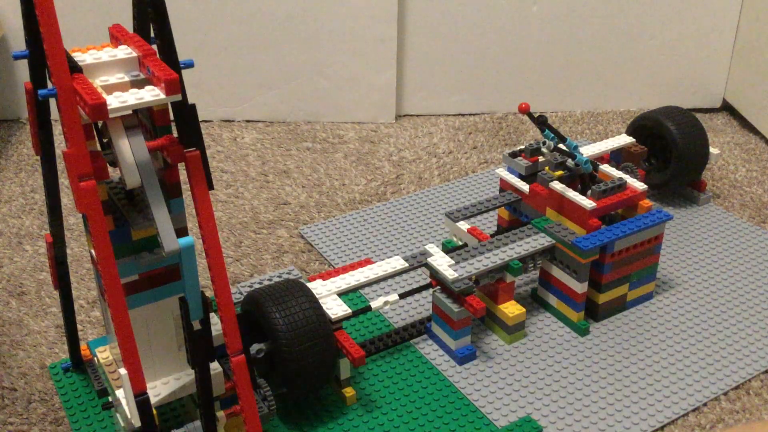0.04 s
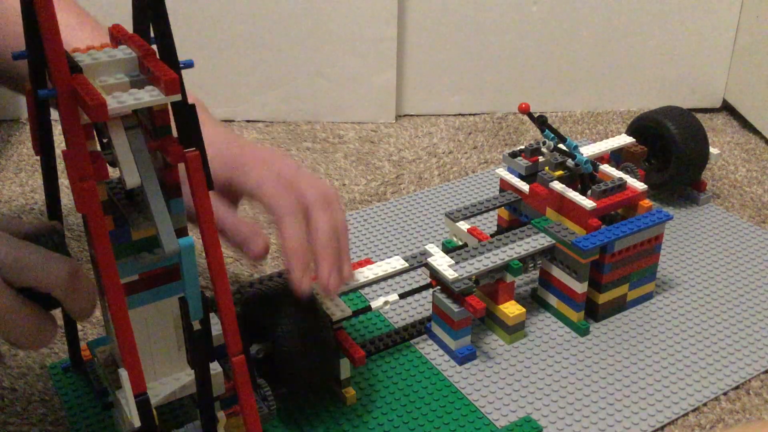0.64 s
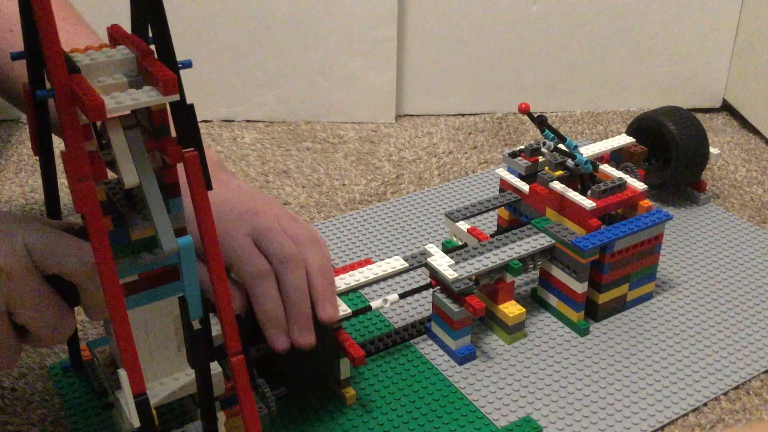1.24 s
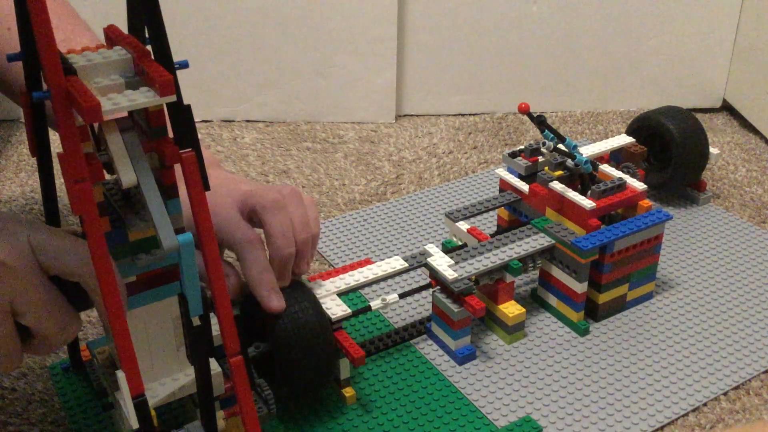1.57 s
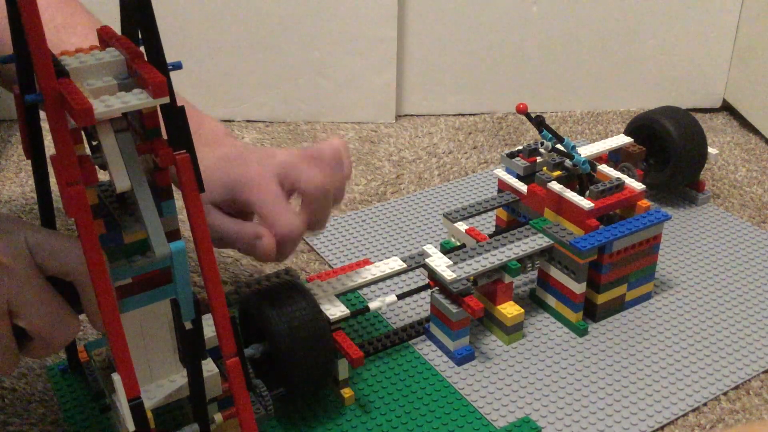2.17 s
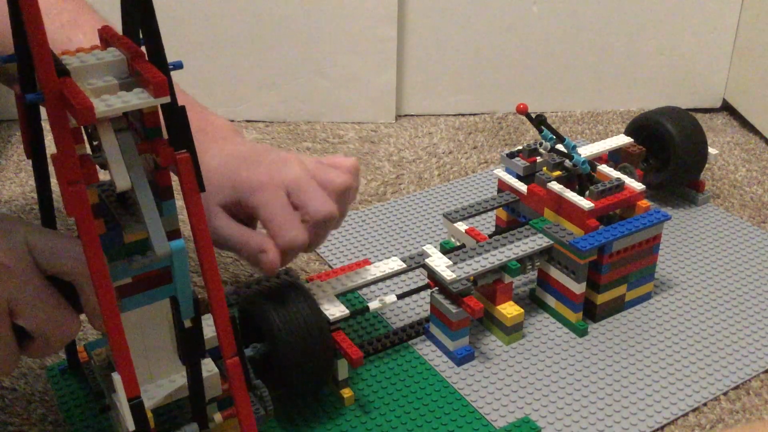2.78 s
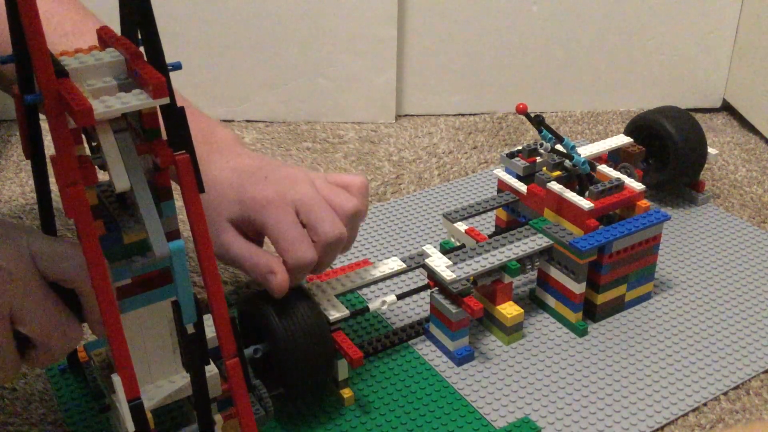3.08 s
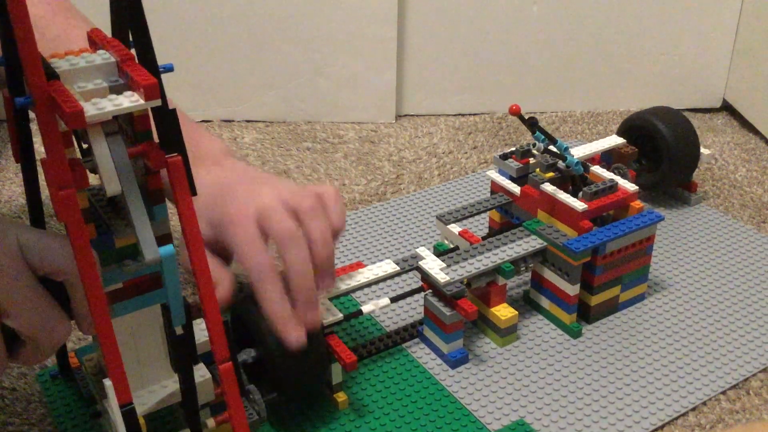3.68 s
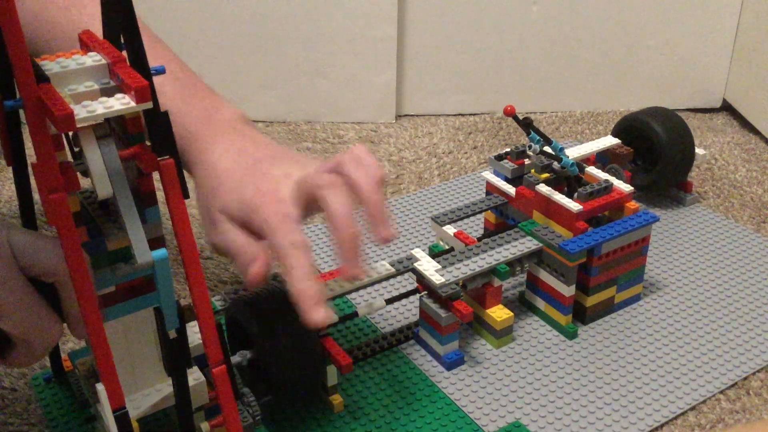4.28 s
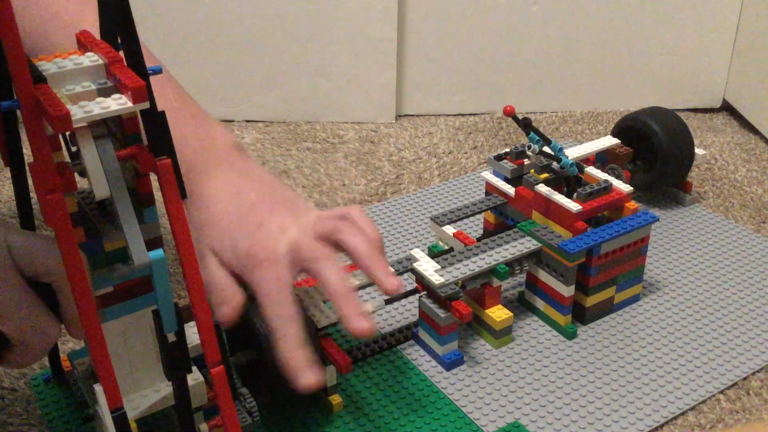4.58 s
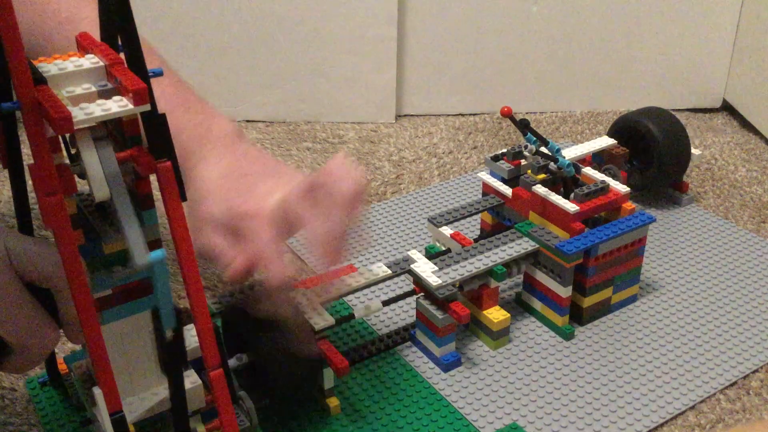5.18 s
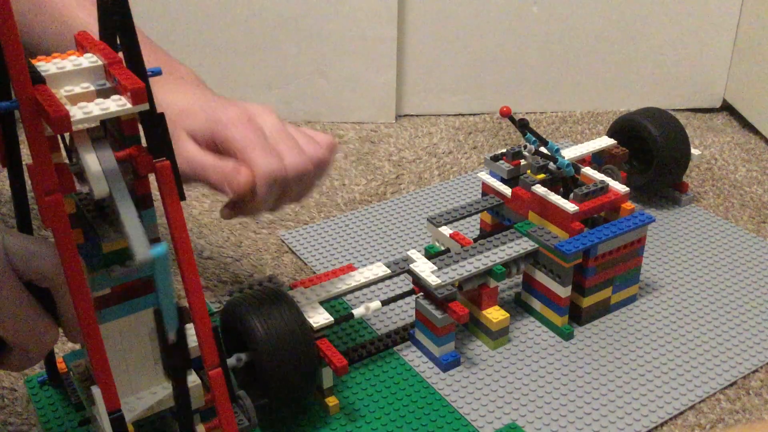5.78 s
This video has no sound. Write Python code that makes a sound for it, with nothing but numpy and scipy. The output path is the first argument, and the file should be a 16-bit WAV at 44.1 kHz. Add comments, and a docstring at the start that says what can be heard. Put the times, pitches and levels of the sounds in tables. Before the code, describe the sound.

A vacuum cleaner runs throughout, close by in a carpeted room, with a steady roar of air, a hum and a high whine. At first its open hose blows hollow, with faint breathy whistles. At about 0.9 seconds the hose seats on a toy engine of plastic bricks. A bright suction hiss starts and grows, while the motor slowly climbs in pitch, its tones swelling and fading.

Tiny high squeaks come from the valve around 1.5 seconds. From 2 to 3 seconds there are short gushes of air, more squeaks and very faint piston knocks. A sharp leak hisses up from 3.1 to 3.4 seconds. The clearest squeak comes with a gush at about 4.1 seconds, and two soft knocks follow near 4.8. From 5.3 seconds to the end, near 6, puffs, squeaks and harder plastic knocks alternate in a quick, uneven run over the whine.

```python
"""A vacuum cleaner hums, whines and roars in a carpeted room, its open hose blowing hollow.
The hose seats on a toy engine of plastic bricks: the choked motor climbs, and its tones swell and fade
through the room's standing waves. Air hisses through the gaps between the bricks. A hand nudges the
flywheel: the slide valve squeaks and gushes, and the piston knocks, faintly at first, then harder."""
import sys
import numpy as np
from scipy import signal
from scipy.fft import rfft, irfft
from scipy.io import wavfile

SR = 44100
rng = np.random.default_rng(int(sys.argv[2]) if len(sys.argv) > 2 else 0)


def transcribe(signal):
    """Save signal, clipped to [-1, 1], as a 16-bit WAV file at the path in sys.argv[1]."""
    frames = np.atleast_2d(signal).T
    limited = np.clip(frames, -1, 1)
    pcm = np.round(limited * 32767).astype(np.int16)
    wavfile.write(sys.argv[1], SR, pcm)


N = 257103
TIME = np.arange(N) / SR
FREQS = np.fft.rfftfreq(N, 1 / SR)
SEAT_S, SEALED_S = 0.883, 1.7  # hose meets the engine, is sealed

# motor shaft speed: t/s, f/Hz
SHAFT_SPEED = [(0.0, 447.7), (0.35, 453.6), (1.02, 456.8), (1.5, 465.9), (2.02, 480.9), (2.37, 486.7),
               (2.98, 486.4), (3.25, 493.2), (3.78, 493.6), (4.13, 502.0), (4.32, 501.0), (4.68, 509.2),
               (4.88, 506.5), (5.29, 510.6), (5.42, 507.2), (5.83, 502.6)]
# resonances of the brick cylinder and its ports: f/Hz, width/Hz, gain/dB
CYLINDER_MODES = [(1714, 200, 7.5), (1984, 120, 4), (2640, 128, -4), (2870, 240, 0.5), (5140, 200, 1.5),
                  (5550, 220, 4.5), (5980, 160, 3.5), (6860, 220, 8.5), (7590, 210, -10), (9840, 120, 6),
                  (10970, 110, 2), (11700, 90, -3)]


def motor(blades=7, jitter=0.00059, flutter_db=1.0, skirt_db=-47, skirt_follow=0.38):
    """Shaft hum and blade whine on one speed; unsteady air gives the whine a fuzzy skirt."""
    # faint overtones: multiple of shaft rate, level/dB re hum
    overtones = [(2, -43), (14, -9.5), (23, -32)]
    # slow drift of the whine: t/s, gain/dB
    whine_drift = [(.5, -1), (2.0, -0.5), (3.7, 2), (4.4, 2), (5.0, .5), (5.8, -1.5)]
    speed_hz = curve(SHAFT_SPEED)
    shaft_hz = speed_hz * (1 + jitter * wander(23))
    phase = 2 * np.pi * np.cumsum(shaft_hz) / SR
    hum = np.sqrt(2) * np.sin(phase)
    for order, db in overtones:
        hum += amp(db) * fuzzy_tone(round(order) * shaft_hz, width_hz=26)
    hum *= amp(standing_wave_db(speed_hz, floor_db=-41))
    whine_db = standing_wave_db(blades * speed_hz, floor_db=-48.5) + curve(whine_drift)
    whine = np.sqrt(2) * np.sin(blades * phase) * amp(whine_db + flutter_db * wander(16))
    # the skirt swells less than the tone: a weak whine is breathy, a strong one pure
    skirt_gain = amp(skirt_db + skirt_follow * (whine_db - whine_db.mean()))
    return hum + whine + skirt_gain * fuzzy_tone(blades * shaft_hz, width_hz=200)


def brick_gaps(gush, rise_s=0.1, mean_speed_db=-28, db_per_hz=0.0992, sag=10, flutter_db=0.47):
    """Suction hiss: starts as the hose seats, grows with motor speed, sags while the valve gushes."""
    # gap spectrum: f/Hz, relative level/dB
    colour = [(300, -61), (1000, -22), (1800, -10.5), (3200, -3), (4500, -17.5), (5700, -9.5), (7500, -11),
              (10400, -5), (11000, 0.5), (12000, 3), (13000, -1), (13900, -8), (15600, -5)]
    speed_hz = curve(SHAFT_SPEED)
    seated = np.clip((TIME - SEAT_S) / rise_s, 0, 1)
    suction = seated * amp(mean_speed_db + db_per_hz * (speed_hz - speed_hz.mean())) / (1 + sag * gush)
    return suction * turbulence(colour, CYLINDER_MODES) * amp(flutter_db * wander(28))


def valve_gush():
    """Gain of the air bursts as the slide valve opens."""
    # openings: t/s, time open/s, level/dB
    openings = [(2.03, 0.078, -32.5), (2.42, 0.066, -32), (2.57, 0.091, -31.5), (2.77, .05, -42),
                (4.15, .12, -31), (4.73, 0.096, -34.5), (5.28, .11, -30.5), (5.445, 0.064, -30.5),
                (5.58, 0.048, -31), (5.7, 0.049, -32.5), (5.81, .03, -39)]
    return sum(amp(db) * swell(s, open_s, attack_s=.011, release_s=.02) for s, open_s, db in openings)


def valve_air(gush):
    """Air seeps through the shut valve and gushes through the open port."""
    # seepage: t/s, level/dB
    seep = [(0, -42), (.45, -35), (.88, -40), (1.2, -34.5), (1.7, -32.5), (2.2, -38.5), (2.75, -32.5),
            (3.1, -38.5), (4.0, -38.5), (4.45, -55), (5.0, -48), (5.83, -36)]
    # port spectrum: f/Hz, relative level/dB
    colour = [(50, -42), (200, -21), (700, -7), (1500, -6), (2800, 3), (4500, 3), (6200, 3), (7200, -7.5),
              (9000, -24), (15000, -37)]
    return np.hypot(level(seep), gush) * turbulence(colour, CYLINDER_MODES)


def leak(level_db=-22):
    """A sharp leak opens while the flywheel is turned."""
    # jet spectrum: f/Hz, relative level/dB
    colour = [(600, -38), (1900, -9), (3400, -4), (4500, -3.5), (6700, -3.5), (7400, -1), (8200, 4.5),
              (9000, -3), (11000, -5), (15500, -9)]
    opening = swell(start_s=3.07, open_s=.29, attack_s=.21, release_s=.03)
    return amp(level_db) * opening * turbulence(colour, CYLINDER_MODES)


def valve_squeaks(full_db=-12, bend_hz=400, rough_per_db=.025, width_hz=220, rise_s=.008, stop_s=.003):
    """The sliding valve sings: strong squeaks are clean and bend up, weak ones rougher and flatter."""
    # squeaks: t/s, length/s, level/dB, f/Hz
    squeaks = [(1.384, .049, -37, 6400), (1.516, 0.066, -32, 3160), (1.731, .017, -24.5, 7650),
               (2.033, 0.015, -25, 7730), (2.05, .063, -32, 7700), (2.423, 0.0094, -19, 7750),
               (2.503, .009, -28, 7650), (2.572, 0.03, -29.5, 7725), (2.777, 0.038, -29, 7450),
               (2.778, 0.049, -30, 6730), (4.144, 0.018, -14, 7870), (4.265, .015, -27, 8600),
               (5.282, 0.01, -18.5, 8070), (5.447, .011, -26, 8070), (5.584, .009, -27, 8050),
               (5.702, 0.0078, -21, 8000), (5.821, 0.008, -19.5, 8000)]
    out = np.zeros(N)
    pole = np.exp(-np.pi * width_hz / SR)
    for s, length_s, db, hz in squeaks:
        progress = np.linspace(0, 1, max(round(length_s * SR), 16))
        grit = signal.lfilter([1], [1, -pole], rng.standard_normal((len(progress), 2)) @ [1, 1j])
        rough = np.clip(rough_per_db * (full_db - db), 0, 1)
        body = np.sqrt(1 - rough) + np.sqrt(rough) * grit / np.sqrt(np.mean(abs(grit) ** 2))
        pitch_hz = hz + bend_hz * amp(db - full_db) * (progress - .5)
        tone = (body * np.exp(2j * np.pi * np.cumsum(pitch_hz) / SR)).real
        rise = np.minimum(progress * length_s / min(rise_s, length_s / 2), 1) ** 1.5
        stop = np.minimum((1 - progress) * length_s / stop_s, 1)
        add(out, s, amp(db) * unit(tone) * rise * stop)
    return out


def piston_knocks(clack_db=-11, clack_t60_s=.025, highpass_hz=62):
    """The piston thumps the frame, whose bricks give a short clack."""
    # stroke ends: t/s, gain/dB
    knocks = [(2.04, -39), (2.119, -36), (2.429, -34), (2.501, -33), (2.711, -30), (2.997, -36),
              (4.743, -25.5), (4.831, -27.5), (5.285, -30.5), (5.392, -24.5), (5.536, -22), (5.581, -26),
              (5.652, -21), (5.699, -24), (5.778, -20), (5.825, -28)]
    # modes of the frame on its base plate: f/Hz, gain/dB, t60/s
    frame_modes = [(92.5, -7.5, 0.066), (119, -3.5, 0.086), (242, -7.5, 0.034), (360, -1.5, 0.018),
                   (1150, -11, 0.026), (2300, -13, .012)]
    out, t = np.zeros(N), np.arange(SR // 5) / SR
    ring = sum(amp(db - 60 * t / t60_s) * np.sin(2 * np.pi * hz * t) for hz, db, t60_s in frame_modes)
    for s, db in knocks:
        clack = rng.standard_normal(len(t)) * amp(clack_db - 60 * t / clack_t60_s)
        add(out, s, amp(db) * (ring + clack))
    # so small a frame radiates no deep bass
    return signal.sosfilt(signal.butter(2, highpass_hz, "highpass", fs=SR, output="sos"), out)


def hose_whistles():
    """The open hose's resonances glide as it is brought up to the engine."""
    # hollow rush at the mouth, deeper as it closes: t/s, level/dB, f/Hz
    mouth = [(0, -41, 1168), (.5, -38.5, 1217), (.85, -38.5, 1155), (1.4, -50, 975), (1.7, -41, 850),
             (1.8, -57, 840)]
    # breathy whistle across the edge: t/s, level/dB, f/Hz
    edge = [(.08, -52, 7000), (.22, -36, 6100), (.33, -44, 4930), (.58, -42, 4170), (.8, -40, 4600),
            (1.4, -54, 5860), (1.7, -44, 6030), (1.8, -62, 5980)]
    # thin, falling whistle as the hose is lifted: t/s, level/dB, f/Hz
    rim = [(0, -46, 9360), (.28, -38, 8500), (.45, -49, 7900), (.75, -60, 7800)]
    return sum(level(glide) * fuzzy_tone(curve(glide, column=2), width_hz)
               for glide, width_hz in [(mouth, 280), (edge, 380), (rim, 520)])


def hose_draught(level_db=-38.5, hold_s=1, release_s=0.67):
    """Low draught in the open hose, dying away as it is sealed."""
    # tube spectrum: f/Hz, relative level/dB
    colour = [(40, -28), (110, -8), (350, 0), (440, 0.5), (650, 1.5), (900, -1.5), (1400, -10.5),
              (3000, -27)]
    return amp(level_db) * np.exp(-np.maximum(TIME - hold_s, 0) / release_s) * turbulence(colour)


def hose_seating(level_db=-30, fade_db_per_s=11.5):
    """Air squeezes past the rim: loudest as the hose seats, fading until it is sealed."""
    # rim spectrum: f/Hz, relative level/dB
    colour = [(60, -40), (300, 0), (900, -9), (1800, -3.5), (3200, -1.5), (4500, -3), (9000, -36),
              (15000, -30)]
    opening = swell(SEAT_S, SEALED_S - SEAT_S, attack_s=.06, release_s=.05)
    fade = amp(level_db - fade_db_per_s * (TIME - SEAT_S))
    return fade * opening * turbulence(colour, CYLINDER_MODES)


def exhaust(level_db=-29):
    """Steady roar of the cleaner's exhaust air."""
    # exhaust spectrum: f/Hz, relative level/dB
    colour = [(25, -58), (55, -21), (90, -10.5), (135, -10), (200, -4), (300, -5.5), (440, -9.5), (650, -9),
              (1200, -9), (1600, -7), (4500, -9.5), (6500, -5.5), (10500, -8.5), (14000, -15.5),
              (15700, -15)]
    # resonances of housing and hose: f/Hz, width/Hz, gain/dB
    housing_modes = [(177.5, 35, 8.5), (242, 69, 5.5), (687, 45, 6.5), (1138, 215, 11), (1363, 130, 6),
                     (1690, 100, 1.5), (2260, 65, 3), (3460, 210, 6)]
    return amp(level_db) * turbulence(colour, housing_modes)


def standing_wave_db(hz, floor_db):
    """Level of a gliding tone, lifted wherever it meets a standing wave of the room."""
    # standing waves: f/Hz, width/Hz, level/dB
    waves = [(455.4, 6.8, -41), (482, 25, -38), (509.7, 8.9, -40), (3187, 35, -42), (3273, 62, -39.5),
             (3355, 55, -29), (3398, 7.1, -34), (3436.5, 34.3, -35.5), (3551.5, 59, -29), (3544, 19, -35)]
    power = sum(amp(db) ** 2 / (1 + (2 * (hz - centre) / width) ** 8) for centre, width, db in waves)
    return 10 * np.log10(amp(floor_db) ** 2 + power)


def hand_echo(x, echo_db=-16, delay_s=0.001117, sway=.15):
    """The moving hand reflects the hiss: faint ripples slide through its colour."""
    swaying_delay_s = delay_s * np.exp(sway * wander(1.3))
    return x + amp(echo_db) * np.interp(TIME - swaying_delay_s, TIME, x)


def room(x, wet_db, t60_s=0.081, taps_per_s=2000, predelay_s=.002):
    """Sparse reflections from walls and floor, soon soaked up by the carpet."""
    t = np.arange(SR // 3) / SR
    taps = rng.choice([-1., 1.], len(t)) * (rng.random(len(t)) < taps_per_s / SR)
    taps *= (t > predelay_s) * amp(-60 * t / t60_s)
    return x + amp(wet_db) * signal.fftconvolve(x, taps / np.linalg.norm(taps))[:N]


def turbulence(colour, modes=()):
    """Air noise of rms 1 with a broad colour and the resonances of the cavity it passes."""
    hz, db = np.transpose(colour)
    colour_db = np.interp(np.log(FREQS + 1), np.log(hz), db)
    for centre_hz, width_hz, peak_db in modes:
        colour_db += peak_db / (1 + (2 * (FREQS - centre_hz) / width_hz) ** 2)
    return unit(irfft(rfft(rng.standard_normal(N)) * amp(colour_db), N))


def fuzzy_tone(hz, width_hz):
    """Narrow noise band that follows the curve hz."""
    phase = 2 * np.pi * np.cumsum(hz) / SR
    return wander(width_hz / 2) * np.cos(phase) + wander(width_hz / 2) * np.sin(phase)


def wander(rate_hz):
    """Random drift of rms 1, up to about rate_hz."""
    return unit(irfft(rfft(rng.standard_normal(N)) / (1 + (FREQS / rate_hz) ** 4), N))


def swell(start_s, open_s, attack_s, release_s):
    """Gain of an air path that opens, holds and dies away."""
    t = TIME - start_s
    return np.clip(t / attack_s, 0, 1) * np.exp(-np.maximum(t - open_s, 0) / release_s)


def curve(rows, column=1):
    """Table column, interpolated linearly in time."""
    columns = np.transpose(rows)
    return np.interp(TIME, columns[0], columns[column])


def level(rows, margin_s=.1):
    """Gain along a dB curve, zero beyond its span plus a margin."""
    return amp(curve(rows)) * ((TIME > rows[0][0] - margin_s) & (TIME < rows[-1][0] + margin_s))


def amp(db):
    """Decibels to gain."""
    return 10 ** (np.asarray(db) / 20)


def unit(x):
    """Scales to rms 1."""
    return x / np.sqrt(np.mean(x ** 2) + 1e-20)


def add(mix, start_s, sound):
    """Mixes a sound in at start_s."""
    part = mix[max(round(start_s * SR), 0):][:len(sound)]
    part += sound[:len(part)]


def scene(sputter_db=1.67):
    """All sources lie close together and reach both channels alike."""
    gush = valve_gush()
    air = exhaust() + brick_gaps(gush)
    # loose parts tremble in the stream and make the jets sputter
    air += (valve_air(gush) + leak()) * amp(sputter_db * wander(49))
    air += hose_whistles() + hose_draught() + hose_seating()
    air = room(hand_echo(air), wet_db=-10)
    engine = room(valve_squeaks() + piston_knocks(), wet_db=-13)
    mono = motor() + air + engine
    return np.array([mono, mono])


def record(dry, cutoff_hz=15790):
    """Steep low-pass band limit."""
    lowpass = signal.firwin(1023, cutoff_hz, window=("kaiser", 9), fs=SR)
    return signal.oaconvolve(dry, lowpass[None], "same", axes=1)


dry = scene()
out = record(dry)
transcribe(out)
```